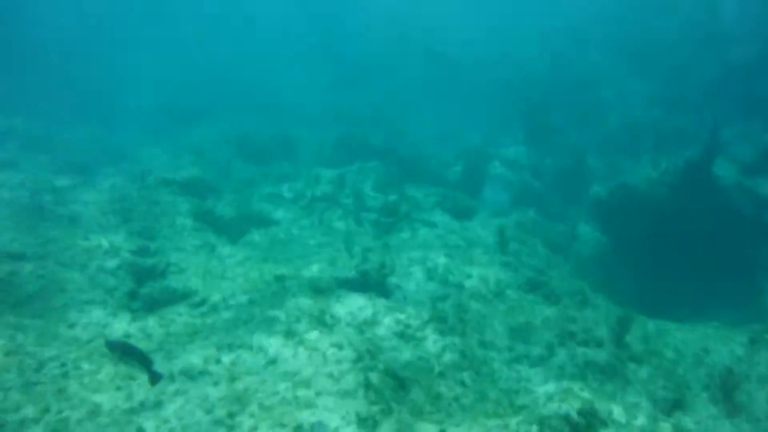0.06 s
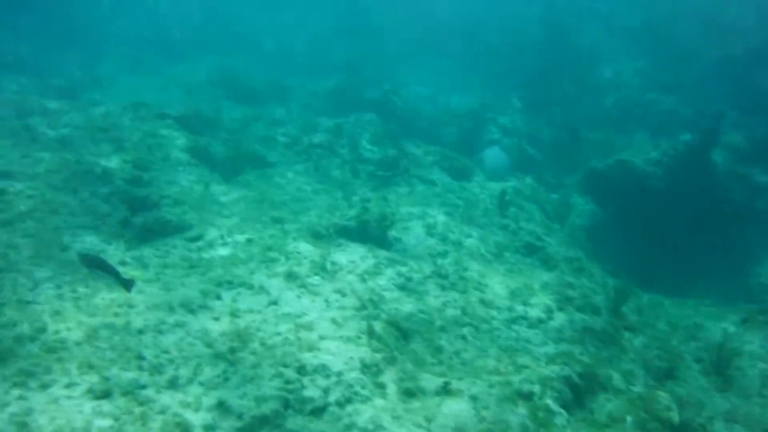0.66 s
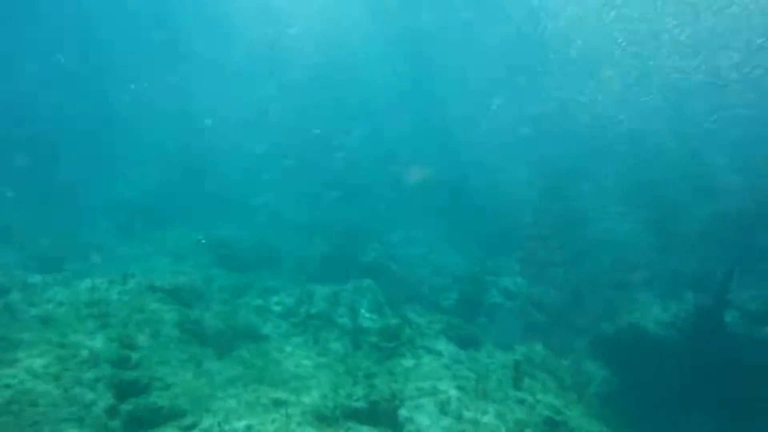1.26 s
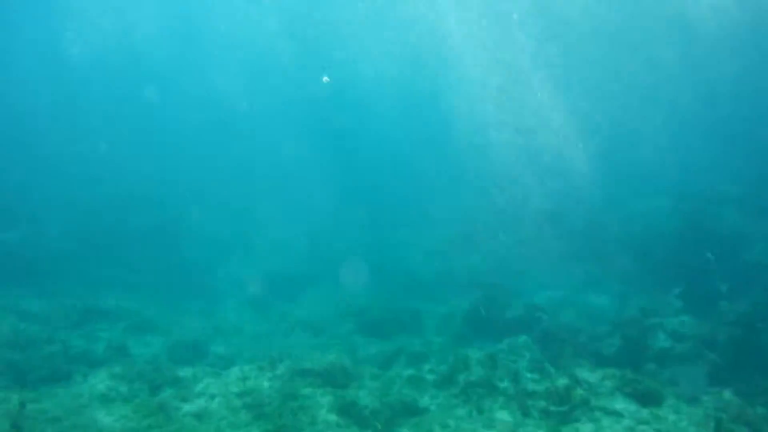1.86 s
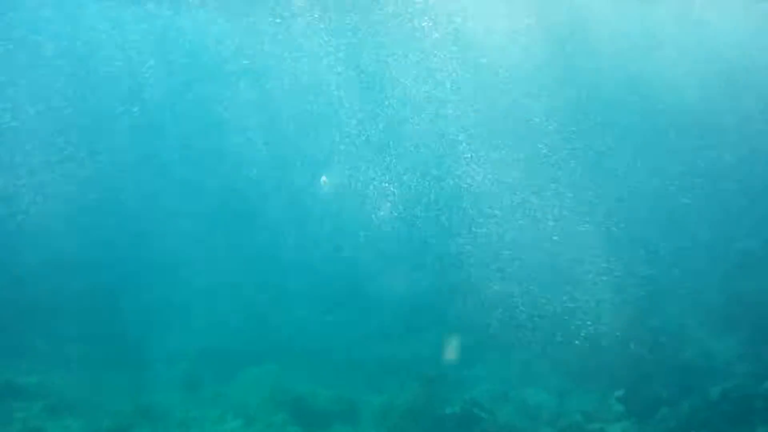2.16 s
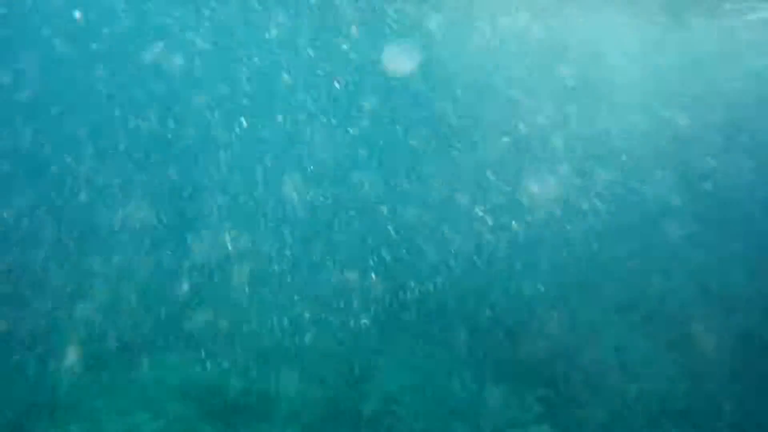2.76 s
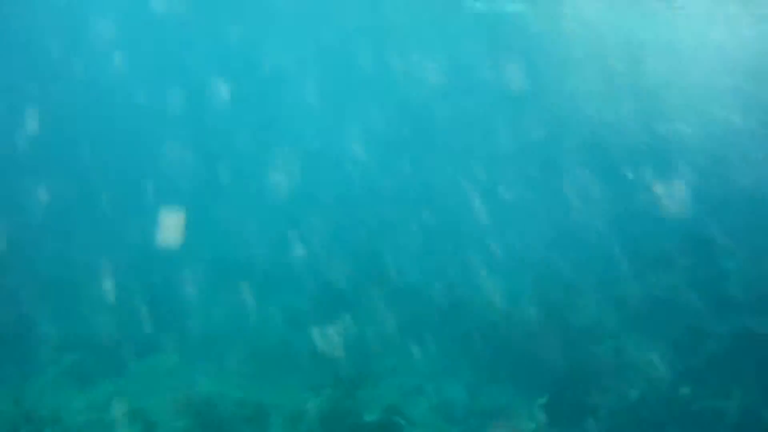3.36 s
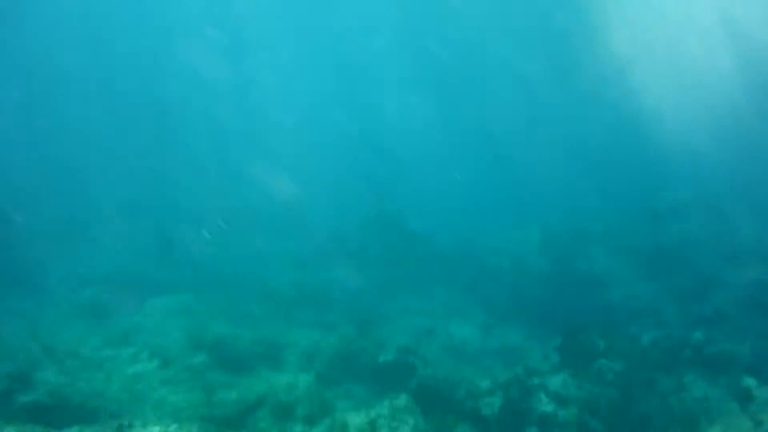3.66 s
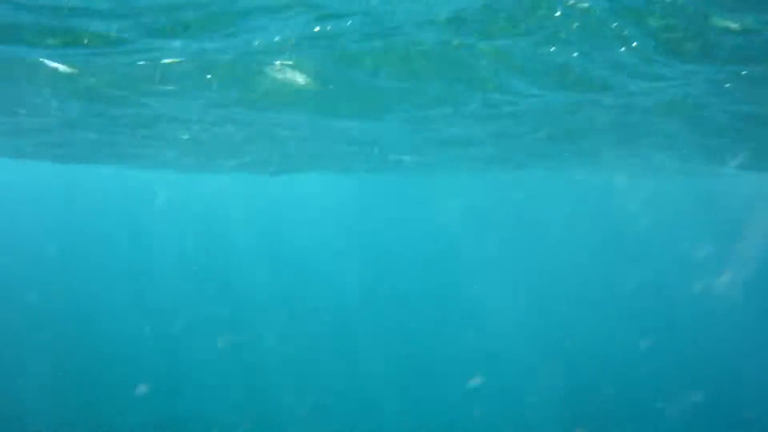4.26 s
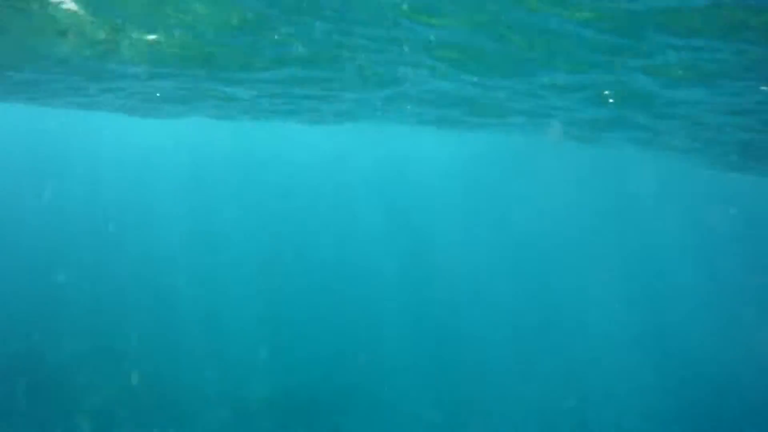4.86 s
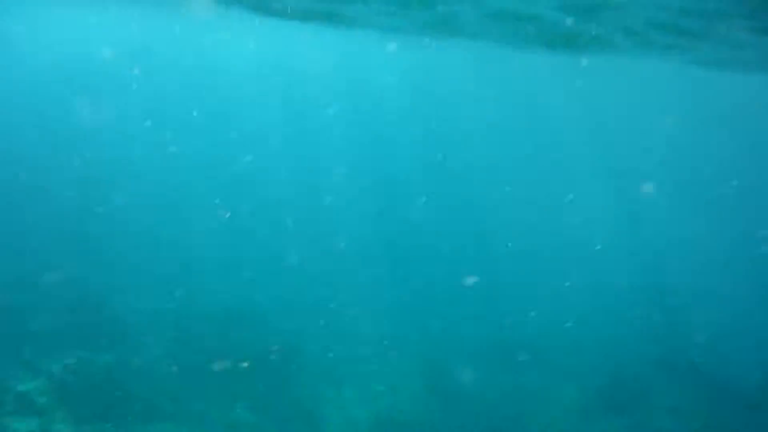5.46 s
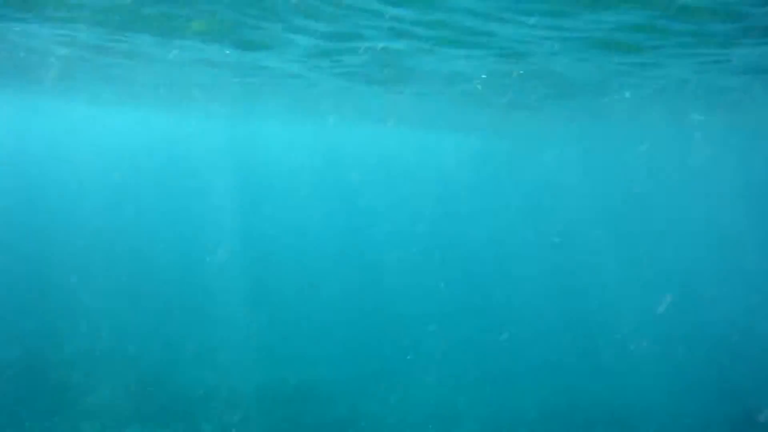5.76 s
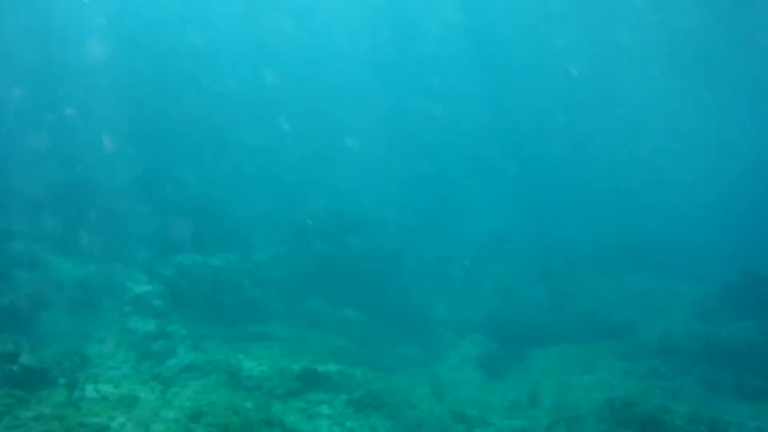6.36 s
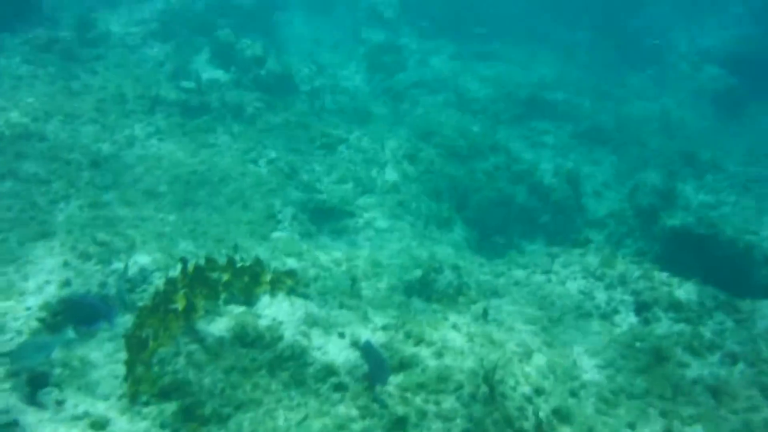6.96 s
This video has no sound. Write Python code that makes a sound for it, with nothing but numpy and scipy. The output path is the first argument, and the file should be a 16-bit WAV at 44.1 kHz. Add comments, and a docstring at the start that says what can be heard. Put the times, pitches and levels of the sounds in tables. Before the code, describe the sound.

Muffled surf rushes and bubbles below the surface, with scattered snaps, crackles, brief dropouts and one loud surge midway.

```python
"""Reef surf from under the surface

Breaking waves trap air that resonates as churning clouds, single gulps and plinks, and fizz, amid snaps.
Eddies buffet a small waterproof camera and foam pops on its housing. The surge stalls its microphone
again and again, so the sound stutters; slaps of water thump, and the loudest moments clip."""
import sys
import numpy as np
from scipy import signal
from scipy.fft import rfft, irfft, next_fast_len
from scipy.io import wavfile
from scipy.ndimage import uniform_filter1d, map_coordinates

SR = 44100
rng = np.random.default_rng(int(sys.argv[2]) if len(sys.argv) > 2 else 0)


def persist_wave(psi):
    """Save psi, clipped to +-1, as 16-bit WAV."""
    counts = np.round(np.clip(psi, -1, 1) * 32767).astype(np.int16)
    wavfile.write(sys.argv[1], SR, np.atleast_2d(counts).T)


N = 313110
T = np.arange(N) / SR

# strength of the churn; the breaker passes overhead just after 3 s: t/s, level/dB
CHURN_LEVEL = [(0, -18.5), (.2, -16), (.42, -13.5), (.8, -16.5), (1.5, -15.5), (1.7, -17.5), (2.98, -21),
               (3.12, -5.5), (3.25, -6), (3.42, -15), (4.1, -16), (4.55, -23.5), (5.1, -17.5), (5.9, -24.5),
               (6.08, -13), (6.38, -19.5), (6.56, -15), (7.1, -18.5)]
# how finely the air is broken up, small bubbles over large: t/s, level/dB
FINENESS = [(0, 3), (.9, 1.5), (1.4, -1), (2.1, 5), (2.7, 4), (3.2, -5.5), (3.5, 6.5), (4, 9.5), (4.5, 6),
            (5.1, 2), (5.5, 3.5), (5.8, 8), (6.3, 1.5), (6.7, 5), (7.1, 11)]
# relative spectra of the bubble cloud, the breaker overhead and the fizz: f/Hz, level/dB
CLOUD_SPECTRUM = [(100, -27), (210, 1), (305, -2.5), (425, -0.5), (500, -11), (630, -4), (700, -8.5),
                  (830, -6), (1200, -15), (1670, -20), (2500, -36), (3000, -33.5), (3500, -52.5),
                  (8000, -60.5)]
ROAR_SPECTRUM = [(90, -22), (250, -7), (480, -3), (900, -5), (1300, -14.5), (2200, -25), (4000, -43),
                 (9000, -55)]
FIZZ_SPECTRUM = [(800, 9.5), (3000, 9), (4500, -3.5), (7000, 0), (7800, -18), (8500, -4.5), (11000, -8),
                 (16000, -8)]

def surf(split_hz=560, ordinary_db=-16, calm_db=-11, violent_db=-6):
    """Bubble resonance: trapped air is a spring, the water its mass; the tiniest bubbles fizz and tick."""
    churn_db, fine_db = curve(CHURN_LEVEL), curve(FINENESS)
    fizz_db = -49 + .22 * (churn_db - ordinary_db) + wobble(10)
    near = swarm(low_hz=277.5, high_hz=2550, cycles=27.8, spread_db=1.84, rise=.016, count=2800, size=1700)
    far = amp(5.5) * rng.standard_normal(N)
    cloud = coloured(near + far, CLOUD_SPECTRUM)
    large = signal.sosfiltfilt(signal.butter(2, split_hz, fs=SR, output='sos'), cloud)
    cloud = amp(-fine_db / 2) * large + amp(fine_db / 2) * (cloud - large)
    # violent water tears off bubbles of every size at once: the resonances merge into a roar
    violence = np.clip((churn_db - calm_db) / (violent_db - calm_db), 0, 1)
    roar = amp(-1.5) * noise(ROAR_SPECTRUM)
    churn = np.sqrt(1 - violence) * cloud + np.sqrt(violence) * roar
    ticks = swarm(low_hz=3870, high_hz=10100, cycles=8.6, spread_db=5, rise=.02, count=1200, size=200)
    far_hiss = amp(2 * wobble(90)) * noise(FIZZ_SPECTRUM)
    flurries = amp(-7 + 5 * wobble(40)) * ticks
    flicker_db = 1.48 * wobble(45) + .5 * wobble(10)
    return amp(churn_db + flicker_db) * churn + amp(fizz_db) * (far_hiss + flurries)


def swarm(low_hz, high_hz, cycles, spread_db, rise, count, size):
    """Superposition of damped oscillators: random bubbles rise in pitch and fall 60 dB over `cycles`."""
    when, pitch, strength = rng.random((count, 3)).T[:, :, None]
    hz = low_hz * (high_hz / low_hz) ** pitch
    turns = hz * np.arange(size) / SR
    age = turns / cycles
    ring = np.sin(2 * np.pi * turns * (1 + rise * np.minimum(age, 1)))
    envelope = amp(-60 * age) * (1 - np.exp(-2 * turns))
    gain = amp(spread_db * np.minimum(-np.log(1 - strength), 5)) * np.sqrt(hz)
    at = (when * N).astype(int) + np.arange(size)
    return unit(np.bincount(at.ravel(), (gain * ring * envelope).ravel(), N + size)[:N])


# single bubbles ringing, from low gulps to high plinks: t/s, level/dB, f/Hz, T60/s
SINGLE_BUBBLES = [(.059, 3, 279, 0.11), (.074, 1.5, 416, 0.071), (.113, 0, 290, 0.041),
                  (.236, -4, 1620, 0.041), (.304, 5, 984, 0.025), (.355, -4, 577, 0.1),
                  (.422, 0.5, 870, 0.036), (.73, 4, 967, 0.038), (0.975, -3.5, 383, 0.041),
                  (1.069, -3, 1057, 0.038), (1.221, -3, 445.4, 0.035), (1.426, -5, 409, 0.14),
                  (1.472, -2, 700, 0.076), (1.574, -1, 797, 0.055), (2.065, 4.5, 390, 0.061),
                  (2.512, -5, 785, 0.034), (2.751, -11, 1810, .034), (2.956, 0.5, 615, 0.038),
                  (2.993, 1.5, 1029, 0.041), (3.121, 7.5, 422, 0.089), (3.207, 4.5, 467.5, 0.16),
                  (3.238, 5, 648, 0.033), (3.294, 7.5, 334, 0.04), (3.481, 1.5, 316.4, 0.14),
                  (3.582, 2.5, 456, 0.034), (3.725, -3.5, 522, 0.072), (4.091, 2.5, 900, 0.037),
                  (4.343, -9.5, 1005, 0.039), (4.434, -9.5, 594, 0.076), (4.632, 0.5, 1803, 0.012),
                  (4.632, -6.5, 3700, 0.011), (4.732, -8, 710.7, .04), (5.13, -9, 423, 0.16),
                  (5.189, -2.5, 1060, 0.027), (5.479, -6.5, 1680, 0.024), (5.501, -7, 1510, 0.045),
                  (5.669, -16, 1610, .075), (5.753, -30, 3700, .033), (6.033, -6.5, 779, 0.044),
                  (6.082, -7.5, 1876, 0.028), (6.081, -8.5, 2860, 0.016), (6.206, 1, 303, 0.024),
                  (6.558, -1, 810, 0.062), (6.607, 2.5, 628, 0.13), (6.765, 3, 1930, 0.014),
                  (7.02, -3.5, 319, 0.11)]

def single_bubbles(spray_gain=.36, rise=.03, attack_s=.0019):
    """Free oscillation: each bubble rings unsteadily at its own pitch amid a burst of bubble noise."""
    out, t = np.zeros(N), T[:SR // 6]
    spray, waver = noise(CLOUD_SPECTRUM), wobble(170)
    for s, db, hz, t60 in SINGLE_BUBBLES:
        here = (round(s * SR) + np.arange(len(t))) % N
        ring = np.sin(2 * np.pi * hz * t * (1 + rise * np.minimum(t / t60, 1)) + .5 * waver[here])
        envelope = amp(db - 60 * t / t60) * (1 - np.exp(-t / attack_s))
        add(out, s, envelope * (ring + spray_gain * spray[here]))
    return out


# sharp snaps close by: t/s, level/dB, housing knock relative to the snap/dB
SNAPS = [(.306, -19, -1), (.731, -21, 13), (.961, -9, .5), (1.472, -11.5, 10), (2.067, -13.5, 2.5),
         (2.3, -21, -14), (2.958, -6, 0), (3.066, -17, 7), (3.088, -10.5, -7), (3.121, 2, 5.5),
         (3.208, -10.5, 2), (3.23, -11.5, -2), (3.251, -12, 5), (3.363, -20.5, 14.5), (3.548, -10.5, -3),
         (3.699, -10.5, -3), (3.959, -11, -7), (4.08, -11.5, 10.5), (4.632, -10.5, 5), (4.979, -20, -2),
         (6.033, -14, 10), (6.081, -21, 9), (6.45, -20.5, -26), (6.607, -17.5, 15.5), (6.622, -16.5, 7),
         (6.766, -16.5, 11.5), (7.024, -21, 2)]
# relative spectrum of a crack: f/Hz, level/dB
CRACK_SPECTRUM = [(300, -22), (1500, 19), (3800, 3), (6000, -9), (9000, -14), (16000, -36.5)]
# modes of the housing: f/Hz, level/dB, T60/s
HOUSING_MODES = [(627, -5, 0.032), (924, 4, 0.017), (1372, -10.5, 0.05), (1796, -26, 0.022),
                 (2385, -15.5, 0.013), (3850, -20, 0.01)]

def snaps(crack_t60=.026, knock_attack_s=.00052):
    """Impulse excitation: a brief crack rings the housing's modes, their strength and pitch varying."""
    out, t = np.zeros(N), T[:SR // 16]
    hiss = noise(CRACK_SPECTRUM)
    for s, db, knock_db in SNAPS:
        ring = np.zeros(len(t))
        for hz, level, t60 in HOUSING_MODES:
            decay = amp(level + rng.normal(0, 4.2) - 60 * t / t60)
            ring += decay * np.sin(2 * np.pi * hz * rng.normal(1, .056) * t + rng.uniform(0, 2 * np.pi))
        knock = amp(knock_db) * ring * (1 - np.exp(-t / knock_attack_s))
        crack = amp(-60 * t / crack_t60) * hiss[(round(s * SR) + np.arange(len(t))) % N]
        add(out, s, amp(db) * (crack + knock))
    return out


# slaps of water on the diaphragm: t/s, first step/full scale, number of swings, swing spacing/s
SLAPS = [(3.264, 1.4, 1, 0), (3.986, .85, 2, 0.012), (4.081, 0.97, 1, 0.00071), (4.25, 0.7, 2, 0.034),
         (4.842, 1.48, 4, .0037), (5.576, 1.9, 3, .016), (6.0207, 1.7, 3, 0.0041), (6.049, 2.1, 3, 0.0074)]

def slaps(rebound=.77, leak_s=.084, edge_s=.00039):
    """Step response: alternating, shrinking pressure steps leak away; harder ones have steeper fronts."""
    out, t = np.zeros(N), T[:SR // 3]
    for s, first, swings, gap in SLAPS:
        for k in range(round(swings)):
            step = first * (-rebound) ** k
            front = 1 - np.exp(-(t * step ** 2 / edge_s) ** 2)
            add(out, s + k * gap, step * front * np.exp(-t / leak_s))
    return out


# bouts of stalls: first release t/s, time to last release/s, number of stalls, first and last length/s
STALL_BOUTS = [(.146, 0, 1, .022), (.195, .038, 2, .022), (.277, .019, 2, .007), (.349, .067, 2, .022),
               (.666, 0, 1, .031), (.764, .197, 5, .024), (1.163, .208, 5, .028), (1.516, .049, 2, .014),
               (1.617, .068, 2, .027), (2.603, .048, 2, .023), (2.924, 0, 1, .013), (3.202, .276, 3, .007),
               (3.614, .043, 2, .014), (3.929, .104, 4, .007), (4.129, .072, 3, .01),
               (4.294, .139, 4, .024), (4.54, 0, 1, .025), (4.664, .067, 2, .027), (4.764, 0, 1, .023),
               (4.841, .095, 3, .017), (5.296, .141, 4, .025), (5.559, 0, 1, .015), (5.625, 0, 1, .056),
               (5.713, 0, 1, .029), (5.819, .034, 2, .027), (5.912, .109, 4, .018), (6.079, 0, 1, .013),
               (6.148, 0, 1, .032), (6.295, .045, 2, .028), (6.42, .051, 2, .02), (6.687, 0, 1, .015),
               (6.861, 0, 1, .022), (7.01, .083, 3, .016)]

def stalls(blinks_per_s=2.2, blink_s=.006, mid_stretch=.38):
    """Intermittent overload: (start, end) of stalls in regular bouts, plus brief random blinks."""
    spans = []
    for first, length, number, held in STALL_BOUTS:
        for progress in np.linspace(0, 1, round(number)):
            release = first + progress * length
            stretch = 1 + mid_stretch * np.sin(np.pi * progress)  # the surge peaks mid-bout
            spans.append((release - held * stretch, release))
    odds = np.cumsum(eddy_strength())  # blinks are likelier in strong eddies
    for draw, stretch in rng.random((round(blinks_per_s * N / SR), 2)):
        start = np.interp(draw * odds[-1], odds, T)
        spans.append((start, start + blink_s * (.5 + stretch)))
    return spans


def diaphragm(pressure, travel, stop, edge_s):
    """Saturation: the surge takes up all the diaphragm's travel; pinned to one side, it passes no sound."""
    pinned, offset = np.zeros(N), np.zeros(N)
    for start, end in stalls():
        span = slice(max(int((start - edge_s) * SR), 0), int((end + edge_s) * SR))
        hold = np.clip(np.minimum(T[span] - start, end - T[span]) / edge_s + 1, 0, 1)
        pinned[span] = np.maximum(pinned[span], hold)
        offset[span] += rng.choice([-1, 1]) * stop * hold
    free = travel * (1 - pinned) ** 2
    return np.clip(pressure, -free, free) + offset


# eddies that swell and fade against the housing: centre t/s, peak level/dB, length/s
EDDIES = [(0.081, -6.5, .12), (0.457, -12, 0.085), (1.097, -18.5, .12), (1.625, -10.5, 0.12),
          (2.096, -11, 0.19), (2.82, -5.5, .28), (3.26, 0, .14), (3.602, -8, 0.26), (4.06, -2, .25),
          (5.521, -10.5, 0.29), (6.23, -7, 0.13), (6.68, -5.5, 0.19)]

def eddy_strength(current_db=-16):
    """Incoherent addition: the steady current and the eddies sum in power, giving one gain curve."""
    swells = [amp(db) * np.exp(-2 * ((T - s) / length) ** 2) for s, db, length in EDDIES]
    return np.sqrt(amp(current_db) ** 2 + np.sum(np.square(swells), axis=0))


# relative spectrum of the buffeting: f/Hz, level/dB
BUFFET_SPECTRUM = [(8, 4.5), (30, 1.5), (60, -0.5), (120, -11.5), (200, -18), (400, -35.5), (1000, -91.5)]

def eddies(lumpy_db=3.5):
    """Turbulent flow noise: water streaming past the housing presses on it in slow lumps."""
    return eddy_strength() * amp(lumpy_db * wobble(30)) * noise(BUFFET_SPECTRUM)


def crackle(water, level_db, growth, pops_per_s=200, spread_db=3.5, life_s=.00094):
    """Shot noise: foam bursts on the housing in tiny random pops, far harder where the water is rough."""
    force = np.abs(uniform_filter1d(water ** 2, size=300)) ** .5
    pops = (rng.random(N) < pops_per_s / SR) * amp(spread_db * np.minimum(rng.exponential(size=N), 3))
    bursts = signal.lfilter([1], [1, -np.exp(-1 / (life_s * SR))], pops)
    return amp(level_db) * coloured(rng.standard_normal(N) * bursts * force ** growth, CRACK_SPECTRUM)


def amp(db):
    """Decibels to amplitude ratio."""
    return 10 ** (np.asarray(db) / 20)


def unit(x):
    """Normalisation to rms 1."""
    return x / np.sqrt(np.mean(x ** 2) + 1e-20)


def curve(rows):
    """Linear interpolation of (t/s, value) rows at every sample."""
    return np.interp(T, *np.transpose(rows))


def wobble(rate):
    """Random modulation: a smooth curve with `rate` knots a second."""
    return map_coordinates(rng.standard_normal(int(N * rate / SR) + 4), [T * rate])


def coloured(x, spectrum):
    """Spectral shaping of x by (f/Hz, level/dB) rows, at rms 1."""
    size = next_fast_len(N + 8192)
    hz, db = np.transpose(spectrum)
    gain = amp(np.interp(np.log(np.fft.rfftfreq(size, 1 / SR) + 1), np.log(hz), db))
    return unit(irfft(rfft(x, size) * gain, size)[:N])


def noise(spectrum):
    """Gaussian noise with the given spectrum, at rms 1."""
    return coloured(rng.standard_normal(N), spectrum)


def add(track, s, sound):
    """Superposition of a sound on the track at time s."""
    part = track[max(round(s * SR), 0):][:len(sound)]
    part += sound[:len(part)]


def scene():
    """Superposition: the pressures sum at the stalling diaphragm, and the slaps add their steps."""
    water = surf() + single_bubbles()
    pressure = water + crackle(water, level_db=-35, growth=1.7) + eddies() + snaps()
    return (diaphragm(pressure, travel=1.15, stop=.17, edge_s=.00096) + slaps())[None]


def record(dry, low_cut_hz=140, hiss_db=-92, top_hz=15800):
    """Band limiting and clipping: a low cut turns steps into thumps; peaks clip at full scale."""
    x = signal.sosfilt(signal.butter(2, low_cut_hz, 'high', fs=SR, output='sos'), dry)
    x = np.clip(x + amp(hiss_db) * rng.standard_normal(N), -1, 1)
    return signal.sosfiltfilt(signal.cheby1(N=10, rp=.05, Wn=top_hz, fs=SR, output='sos'), x)


dry = scene()
out = record(dry)
persist_wave(out)
```